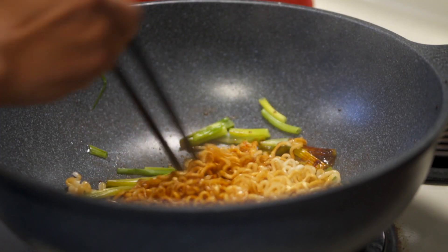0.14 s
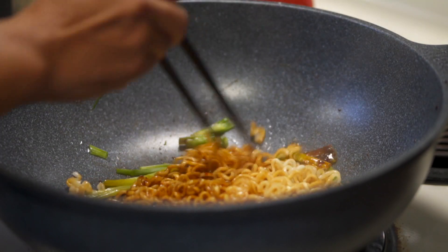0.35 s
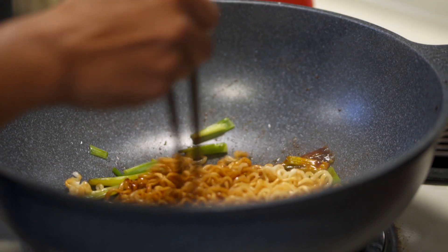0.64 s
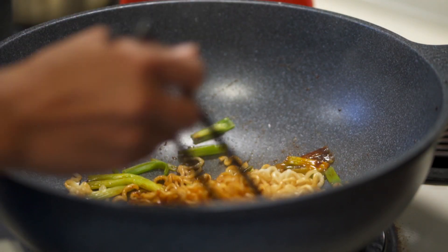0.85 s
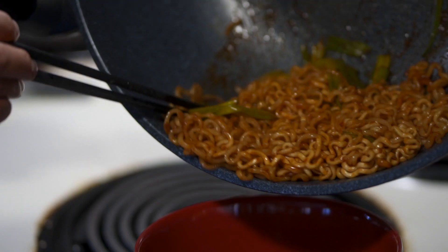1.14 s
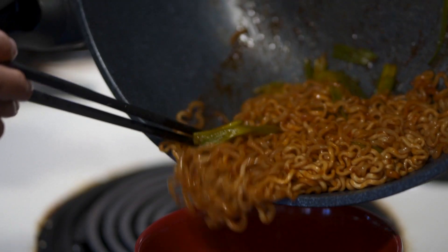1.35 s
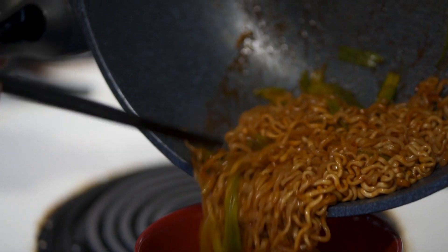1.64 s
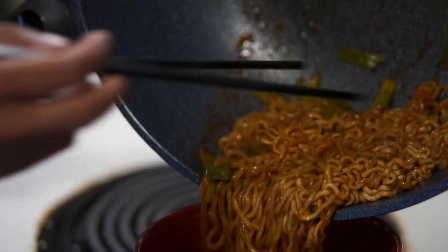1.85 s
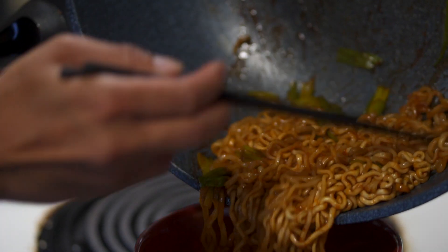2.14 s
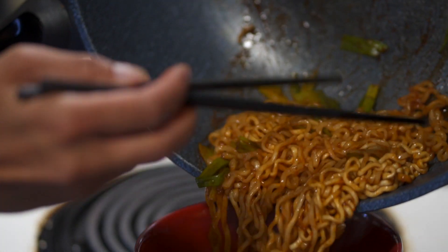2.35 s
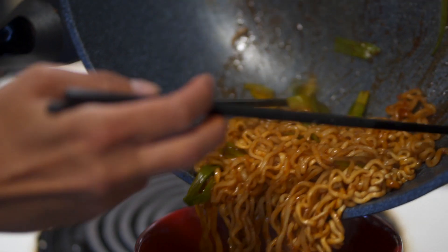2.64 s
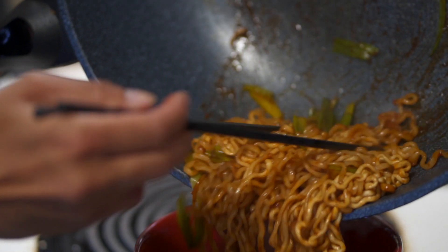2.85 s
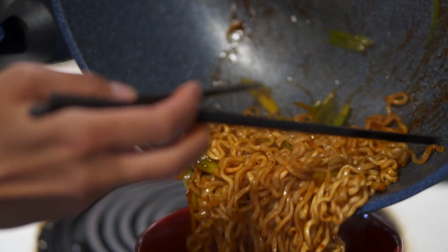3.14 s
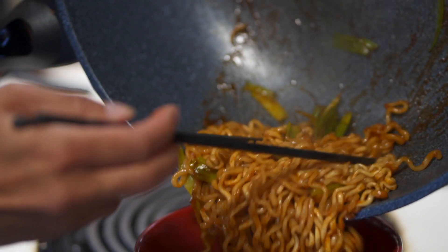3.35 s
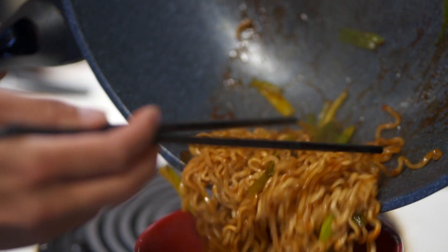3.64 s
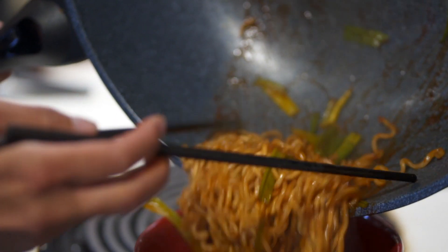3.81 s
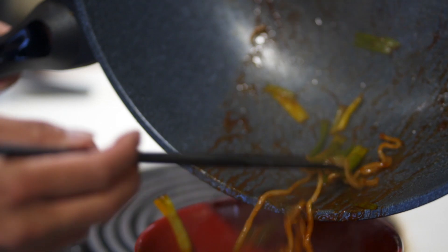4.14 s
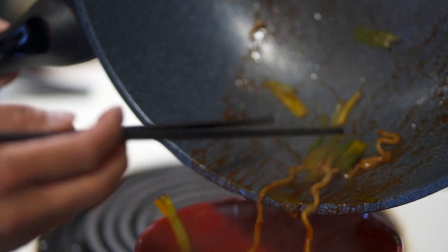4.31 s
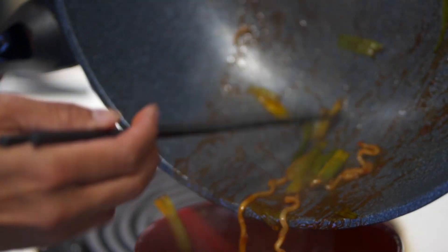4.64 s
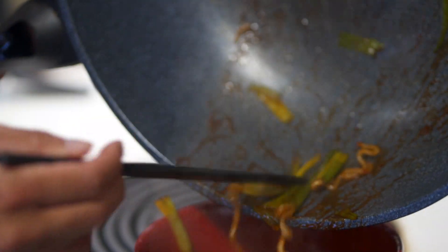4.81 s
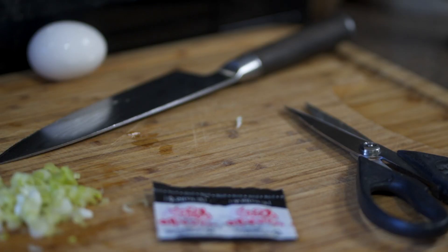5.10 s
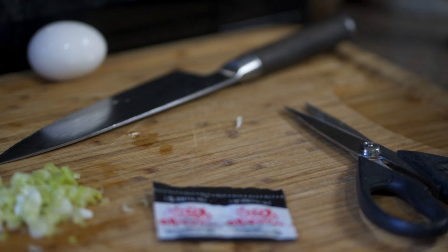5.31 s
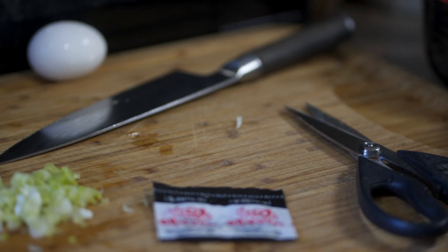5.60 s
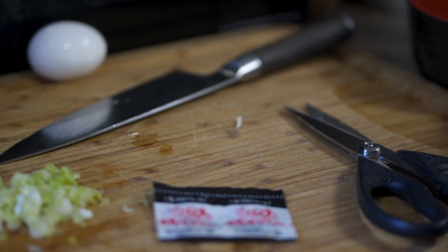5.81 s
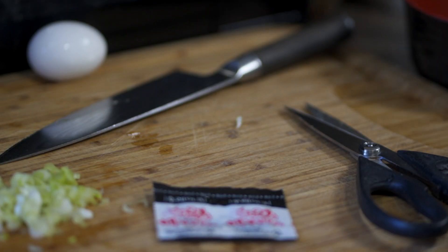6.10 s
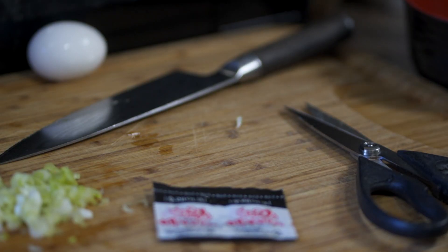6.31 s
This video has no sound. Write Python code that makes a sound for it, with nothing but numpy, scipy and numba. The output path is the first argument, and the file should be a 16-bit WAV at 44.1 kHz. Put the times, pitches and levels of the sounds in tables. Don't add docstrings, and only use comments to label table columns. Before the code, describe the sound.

Close kitchen sounds: hissing oil and sharp stirring taps, faint noodle touches, bright ringing wok scrapes, then a heavy bowl knock on wood over low hum.

```python
import sys
import numpy as np
from scipy import signal
from scipy.fft import rfft, irfft
from scipy.io import wavfile
from scipy.ndimage import uniform_filter1d
from numba import njit

SR = 44100
rng = np.random.default_rng(int(sys.argv[2]) if len(sys.argv) > 2 else 0)


def materialize(psi):
    bounded = np.clip(np.atleast_2d(psi).T, -1, 1)
    quanta = np.round(bounded * 32767).astype(np.int16)
    wavfile.write(sys.argv[1], SR, quanta)


def how_loud(loudness_db):
    steps = np.asarray(loudness_db, float) / 20
    return 10 ** steps


N = 284886
SPAN = 22050
BANDS_HZ = 16000 / 2. ** np.arange(9)

SCENE_S = (0, 1.135, 4.93, 6.47)
EMPTYING_S = (2.7, 3.7, 3.85)

# frequency in Hz, level in dB per Hz.
WOK_FULL = [(35, -45.5), (60, -21), (165, -16), (600, -11.5), (796, -3.5), (1690, -13), (2090, -7),
            (2460, -9.5), (4030, -0.5), (4750, -10.5), (6150, 0.5), (12700, -22), (16500, -40)]
# frequency in Hz, level in dB per Hz.
WOK_LOADED = [(290, -33.5), (500, -21.5), (1450, -17.5), (2540, -12.5), (2980, -11), (3880, -4), (4550, -5),
              (11100, -10), (15300, -23.5), (16500, -43.5)]
# frequency in Hz, level in dB per Hz.
WOK_TIPPED = [(240, -34.5), (400, -9.5), (679, -19.5), (769, -15.5), (844, -10), (1700, -19.5),
              (2980, -16.5), (3320, -15.5), (3530, -15), (5380, -3), (10700, -14.5), (15300, -37),
              (16500, -63)]
# frequency in Hz, level in dB, t60 in seconds.
WOK_MODES = [(768, -1, .8), (1416, -11, .5), (2374, -3, .3), (3040, -1, .4), (3594, -6, .4), (4000, -6, .4),
             (4430, -7, .35), (4570, -12, .2), (5206, -12, .3), (5410, -9, .25), (5720, -11, .3),
             (6090, -12, .3), (6778, -14, .3), (7246, -14, .3), (8260, -16, .25)]
# time in seconds, peak in dB, tilt in dB per octave, low part in dB.
STIR_TAPS = [(0.158, 3.5, 5.5, -40), (0.1789, -4.5, -4.5, -29.5), (0.1968, -7.5, -2, -26),
             (0.3754, -1, 0, -12.5), (0.4252, -8.5, -3, -15), (0.4884, -23, -4.5, 1),
             (0.5147, -17, -3, -6.5), (0.6812, 5.5, 2.5, -27), (0.8148, -20, 10, -35.5),
             (0.933, 0.5, -1.5, -23)]
# time in seconds, peak in dB, tilt in dB per octave, low part in dB.
TOUCHES = [(1.167, -30, 2.5, -18.5), (1.3521, -54, 12.5, -26), (1.368, -22, 3.5, -13.5),
           (1.8016, -41.5, -12, -17), (1.821, -29.5, -7, -27), (1.877, -28.5, 2.5, -17.5),
           (1.9428, -40.5, -16, -11.5), (1.9825, -44, -14, -18), (2.116, -39.5, -12, -23.5),
           (2.181, -23.5, 4.5, -10.5), (2.2025, -24.5, 3.5, -18), (2.5092, -41.5, -9.5, -22),
           (2.592, -58, 4.5, -1.5), (3.7651, -15, 9, -16.5)]
# time in seconds, peak in dB, tilt in dB per octave, low part in dB.
SCRAPE_TAPS = [(2.7277, -3.5, 3, -31.5), (2.7826, -19.5, 1.5, -18.5), (3.1118, -44.5, 10.5, -15.5),
               (3.1384, -19.5, 1.5, -31), (3.2037, -7, 2.5, -25), (3.2824, -6.5, 1, -51),
               (3.688, -44.5, -6, -15), (3.9047, -0.5, 3, -29), (3.9408, -7, 3.5, -30),
               (4.118, -31, -7.5, -7), (4.1794, -43.5, 13, -3.5), (4.2574, -47, 15.5, 0.5),
               (4.5198, -29.5, -3.5, -27.5), (4.6628, 0.5, 3.5, -27), (4.6795, -0.5, 3.5, -38)]
# start in seconds, swell in seconds, level in dB, t60 in seconds,
# tilt in dB per octave.
DRAGS = [(0.1485, 0.0016, -21, 0.022, 6.5), (0.17, 0.045, -23.5, 0.46, 0.5), (0.39, 0.046, -23.5, 0.28, -4),
         (0.506, 0.032, -28.5, 0.05, 6), (0.70, 0.037, -14.5, 0.23, -5.5), (0.80, 0.042, -28, 0.41, -1),
         (0.95, 0.047, -32.5, 0.85, -1), (2.76, 0.062, -31, 0.34, -3), (3.23, 0.02, -31, 0.25, -1.5),
         (3.31, 0.019, -36.5, 0.49, -1.5), (3.764, 0.028, -35.5, 0.17, -0.5),
         (3.96, 0.047, -25.5, 0.14, -0.5), (4.04, 0.02, -34, 0.31, 1), (4.695, 0.011, -20, 0.57, -1.1)]
DRAG_LOW_DB = (-15.5, -9.5, -19.5)
# time in seconds, peak in dB.
CRACKS = [
    (.158, -6),
    (0.3755, -7),
    (.8148, -21.5),
    (.933, -9),
    (3.2849, -13.5),
    (3.908, -8.5),
    (4.6669, -2.5),
    (.1487, -10),
]
# time in seconds, swell in seconds, level in dB, share of free decay 0-1.
RINGS = [(0.389, 0.013, -43, 0.8), (0.935, 0.0057, -25.5, 0.21), (2.729, 0.014, -35, 1),
         (2.815, 0.018, -32, 0.41), (3.202, 0.0016, -61, 0.5), (3.24, 0.027, -34, 1),
         (3.281, 0.0047, -32, 0.29), (3.905, 0.0026, -42, 0.34), (3.98, 0.019, -37, 0.55),
         (4.664, 0.0039, -36.5, 0.45), (4.69, 0.0096, -23, 1)]
# time in seconds, frequency in Hz, level in dB, t60 in
# seconds.
WOK_PINGS = [(0.181, 3930, -6.5, 0.067), (0.187, 2856, -11.5, 0.082), (0.412, 161, -28.5, 0.27),
             (0.712, 2103, -14.5, 0.19), (1.17, 6850, -47.5, .35), (1.17, 8520, -39, 0.1),
             (1.369, 3920, -35.5, 0.16), (1.37, 12480, -49, 0.12), (1.821, 9040, -45, 0.03),
             (1.885, 6300, -47.5, 0.3), (1.878, 8530, -40, 0.1), (1.943, 2800, -46, .1),
             (2.182, 3920, -34, 0.21), (2.20, 5260, -42.5, 0.62), (2.21, 7250, -47, 0.38),
             (2.203, 10660, -33, 0.1), (1.17, 5000, -48, 0.15), (1.18, 4290, -50, 0.28),
             (1.372, 5220, -44, 0.11), (1.39, 5840, -51, 0.34), (1.37, 11600, -53, .14),
             (1.878, 11400, -52, .15), (2.203, 9800, -51, 0.17), (2.203, 11500, -48, .13),
             (2.51, 7430, -57.5, 0.17),
             (2.728, 3025, -28, .24), (2.822, 2480, -36, .36), (3.139, 7400, -31, .06),
              (3.285, 2400, -30, .2), (3.285, 1414, -40.5, .55), (3.775, 5310, -29, .17),
              (3.906, 3050, -22.5, .22), (3.907, 3830, -11, .075), (3.99, 1560, -39, .25),
              (4.67, 2374, -23.5, .36), (4.699, 1416, -31, .45), (4.664, 1416, -31, .3),
              (4.0, 770, -42, .3), (3.906, 2200, -18, .045), (.376, 11300, -16, .025),
              (.378, 5300, -19, .1), (.44, 10500, -38, .04), (3.206, 950, -31, .06), (3.33, 2480, -41, .3),
              (3.344, 3960, -32, .08), (4.667, 5500, -13, .04), (4.80, 3050, -36, .3),
              (3.92, 5470, -21, .07), (3.905, 1567, -30, .1), (3.79, 5750, -46, .4), (4.70, 4020, -26, .35),
              (2.845, 3040, -37, .3), (3.139, 3600, -36, .05), (3.139, 6100, -33, .08),
              (4.757, 4450, -27, .2), (4.519, 3600, -42, .035), (3.32, 3050, -41, .38),
             (0.159, 6030, -1.5, 0.046), (.376, 950, -22, 0.042), (.388, 1590, -24.5, 0.17),
             (.389, 474, -30, 0.11), (.404, 963, -23.5, 0.13), (.436, 790, -28, 0.13),
             (0.439, 478, -25.5, 0.12), (.515, 810, -29.5, 0.1), (.682, 2795, -10.5, .05),
             (.934, 3920, -11.5, 0.046), (2.728, 4430, -15, 0.089), (2.728, 6140, -14, .05),
             (2.728, 6670, -8.5, 0.036), (2.785, 3610, -32, .2), (2.79, 3920, -33.5, 0.39),
             (3.203, 6460, -10.5, 0.038), (3.203, 8330, -14.5, 0.044), (3.204, 4400, -23, .07),
             (3.245, 3620, -35.5, 0.35), (3.283, 5380, -6.5, 0.038), (3.283, 3920, -15.5, 0.05),
             (3.284, 3033, -19, 0.094), (3.283, 3650, -26, 0.09), (3.905, 4380, -23, .09),
             (3.906, 6240, -25, 0.067), (3.942, 5394, -16, 0.054), (3.943, 6270, -16.5, 0.071),
             (3.943, 4500, -26.5, 0.09), (3.985, 4420, -39, .25), (4.663, 5350, -4.5, 0.055),
             (4.664, 6130, -7.5, 0.057), (4.663, 7750, -3.5, 0.048), (4.663, 8160, -13, 0.043),
             (4.68, 4450, -16.5, 0.085), (4.681, 5696, -14, .08), (4.679, 3000, -18, .12),
             (4.705, 3670, -24, 0.25), (4.72, 5440, -20, 0.16), (4.723, 5880, -16.5, 0.083),
             (4.757, 4040, -24, 0.19), (4.664, 775, -31, 0.34)]
# time in seconds, frequency in Hz, level in dB, t60 in seconds.
MORE_PINGS = [(2.183, 6550, -40, .08), (2.205, 5700, -46, .25), (2.205, 8550, -46, .15),
              (4.52, 7400, -43, .05), (4.52, 9000, -45, .05), (4.521, 6000, -46, .1),
              (4.05, 1416, -50, .45), (3.99, 4420, -35, .15), (5.69, 3400, -25, .12),
              (5.715, 1100, -19, .1), (1.39, 5650, -51, .3)]

# frequency in Hz, level in dB per Hz.
BOARD = [(24, -48), (40, -36.5), (77, -8.5), (145, -1.5), (186, -32), (228, 1), (300, -12.5), (744, -10),
         (1230, -15.5), (2250, -19.5), (3920, -24), (4680, -25.5), (5050, -24), (11600, -44.5),
         (16500, -57)]
# time in seconds, peak in dB, tilt in dB per octave, low part in dB.
KNOCKS = [
    (5.435, -32, 4, -21),
    (5.4877, -37, 0.5, -19),
    (5.6193, 8, 1, -19),
    (5.636, 5, 3.5, -9),
    (5.8022, -15.5, 1.5, -17),
    (5.8572, -0.5, -0.5, -16),
]
# time in seconds, peak in dB.
BOARD_CRACKS = [
    (5.4885, -37),
    (5.8025, -16.5),
    (5.8575, -0.5),
    (5.6195, 0),
]
# start in seconds, swell in seconds, level in dB, t60 in seconds, low part in dB.
SLIDES = [
    (5.298, 0.015, -52.5, 0.19, 12),
    (5.645, 0.052, -12.5, 0.13, -6),
    (5.70, 0.017, -17, 0.41, -10),
    (5.766, 0.024, -28.5, 0.077, -11),
    (5.80, 0.014, -22, 0.19, -2),
    (5.862, 0.017, -21, 0.15, -2.5),
    (5.90, 0.04, -32, 0.3, -5),
    (6.04, 0.045, -58, 0.48, 10),
]
# time in seconds, frequency in Hz, level in dB, t60 in seconds.
ROCKING = [(5.62, 865, -5, 0.082), (5.62, 600, -7.5, 0.11), (5.634, 136.5, -15, 0.12),
           (5.637, 748, -4.5, 0.11), (5.643, 250, -8.5, .12), (5.644, 418, -10.5, 0.077),
           (5.661, 83.6, -24, 0.59), (5.668, 640, -7.5, 0.084), (5.671, 248.3, -10.5, 0.084),
           (5.678, 117, -15, 0.13), (5.685, 207, -14, 0.076), (5.69, 581, -13, 0.093),
           (5.695, 267.5, -14, 0.092), (5.709, 701, -6, 0.093), (5.709, 511, -14.5, .1),
           (5.716, 383, -13, 0.09), (5.723, 1071, -11, 0.074), (5.775, 732, -15.5, 0.07),
           (5.801, 770, -16.5, 0.078), (5.803, 969, -15.5, .06), (5.807, 323, -13, 0.087),
           (5.815, 577, -12, 0.12), (5.815, 192, -11.5, 0.083), (5.829, 170.9, -13.5, 0.12),
           (5.857, 752, -7.5, 0.14), (5.857, 602, -8.5, 0.066), (5.857, 986, -10.5, 0.059),
           (5.867, 437, -10.5, 0.076), (5.873, 301, -10, 0.085), (5.886, 117, -19.5, 0.19),
           (5.891, 603, -22, 0.12), (5.92, 226, -25, 0.23), (5.91, 86.4, -26.5, 0.36),
           (6.0, 73.8, -36.5, 0.91)]
# time in seconds, frequency in Hz, level in dB, t60 in seconds.
BOWL_PINGS = [(5.62, 2190, -3, .03), (5.637, 2280, -14, .04), (5.649, 4753, -21, .29),
              (5.705, 3327, -26, .12), (5.70, 2218, -25, .08), (5.735, 2820, -36, .35),
              (5.801, 3350, -22, .07), (5.857, 2261, -9, .035), (5.915, 2260, -33, .2),
              (5.868, 2100, -25, .05), (5.70, 4650, -28, .2), (5.639, 1640, -17, .06)]
# time in seconds, peak in dB, tilt in dB per octave, low part in dB.
FOOT_TICKS = [
    (5.8024, -17.5, -4, -12),
    (5.8274, -27, 5, -26),
    (5.8812, -26.5, 3.5, -30),
    (5.9236, -31.5, 0.5, -30),
    (5.868, -22, -8, -15),
]
GLAZE_HZ = (2230, 2800, 3350, 4620, 5680, 6570, 7880, 9030, 11350)
# start in seconds, swell in seconds, level in dB, t60 in seconds,
# tilt in dB per octave.
GRINDS = [
    (5.65, .03, -26.5, 0.39, -12),
    (5.74, 0.052, -38, .4, -7),
    (5.875, 0.018, -38, 0.37, -3),
    (5.92, 0.018, -41, 0.27, -2),
]

# frequency in Hz, level in dB per Hz.
CLOTH = [(300, -33), (1500, -9), (4500, 1.5), (8000, -2.5), (16000, -27)]
# start in seconds, level in dB, t60 in seconds.
RUSTLES = [
    (4.991, -55, 0.27),
    (5.07, -56.5, .2),
    (5.119, -51.5, 0.15),
    (5.195, -52, 0.12006),
    (5.306, -53.5, 0.38),
    (5.525, -54.5, 0.16),
    (6.118, -47.5, 0.75),
    (6.199, -55, 0.35),
    (6.295, -54.5, 0.31),
    (6.388, -55.5, .3),
]
# time in seconds, peak in dB, tilt in dB per octave, low part in dB.
TICKS = [
    (.318, -21.5, -8, -20),
    (1.568, -47.5, 14.5, -30),
    (1.64, -53.5, 6, -31.5),
    (2.02, -52.5, 5.5, -29),
    (2.452, -48.5, 8, -28),
    (2.593, -42, 11.5, -30.5),
    (4.441, -42, 3, -32.5),
]

# time in seconds, level in dB.
FRY = [
    (0.0, -32.5),
    (0.232, -41.5),
    (0.356, -37),
    (0.518, -34.5),
    (0.89, -32.5),
    (0.972, -35.5),
    (1.02, -36.5),
    (1.135, -38),
]
# frequency in Hz, level in dB per Hz.
SIZZLE = [(290, -40.5), (500, -12.5), (753, -2), (1090, -19.5), (1290, -2), (1410, -11), (3880, -4.5),
          (11000, -7.5), (15600, -19), (16500, -37)]
# frequency in Hz, level in dB per Hz.
AIR_STOVE = [(15, -50.5), (25, -35.5), (105, -2.5), (167, -3), (220, -4.5), (266, -4), (553, -13.5),
             (952, -20.5), (1060, -20), (2670, -31.5), (3910, -28), (4240, -30.5), (9080, -33.5),
             (15200, -42), (16500, -74.5)]
# frequency in Hz, level in dB per Hz.
AIR_BOARD = [(15, -53), (25, -28), (150, -11), (220, -0.5), (245, -19), (280, -26.5), (330, -21.5),
             (902, -29.5), (1060, -33), (3910, -36.5), (11000, -43), (15200, -47.5), (16500, -70.5)]
AIR_DB = (-47, -48, -42.5)
# frequency in Hz, level in dB, waver in dB,
# gain near the board in dB.
HUM = [(55.7, -59, 2, 2), (63, -57.5, 0.5, 0), (111, -53, 3.5, 2.5), (182, -71.5, 4.5, 14),
       (219.7, -44, 6, 8), (325, -58.5, 4.5, 1.5), (401, -59, -1.5, -2.5), (1053, -64.5, 3, -3),
       (3800, -73, 6, 5)]

# clatter t60 in seconds, its growth in dB per dB of tilt, after-rattle in dB.
FULL_DECAY, LOADED_DECAY = (0.066, 0.05, -16), (0.091, 0.76, -15)
BARE_DECAY, BOARD_DECAY = (0.04, 0.3, -12.5), (0.034, 0.3, -22)
CRACK_DECAY = (0.014, 0.01, -30)
TICK_DECAY = (0.028, .01, -34.5)


def shape(table, hz):
    f, db = np.transpose(table)
    return np.interp(np.log(np.maximum(hz, 1)), np.log(f), db)


def noise(table):
    x = irfft(rfft(rng.standard_normal(N)) * how_loud(shape(table, np.arange(N // 2 + 1) * SR / N)), N)
    return x / x.std()


def walk(rate_hz):
    k = int(SR / rate_hz)
    held = np.repeat(rng.standard_normal(N // k + 1), k)
    return 0.18 * uniform_filter1d(uniform_filter1d(held, k), k)[:N]


def fade(t, t60):
    return np.exp(-np.log(1000) * np.maximum(t, 0) / t60)


def add(out, x, s):
    i = int(s * SR)
    scene_end = int(SCENE_S[np.searchsorted(SCENE_S, s, side="right")] * SR)
    end = min(scene_end, N, i + len(x))
    out[i:end] += x[:end - i]


def contact(colour, split_hz, tilt_db, low_db, envelope, ripple_db, ripple_hz, damping):
    t, f = np.arange(SPAN) / SR, np.arange(SPAN // 2 + 1) * SR / SPAN
    ripple = ripple_db * np.interp(f, ripple_hz * np.arange(2000), rng.standard_normal(2000))
    tilt = tilt_db * np.log2(np.maximum(f, split_hz) / split_hz)
    gain = how_loud(shape(colour, f) + ripple + tilt)
    low_share = 1 / (1 + (f / split_hz) ** 4)
    high, low = gain * (1 - low_share), gain * low_share
    gain = high / np.linalg.norm(high) + how_loud(low_db) * low / np.linalg.norm(low)
    spectrum = rfft(rng.standard_normal(SPAN)) * gain * np.sqrt(SPAN / 2)
    octave = np.log2(np.clip(f, BANDS_HZ[-1], BANDS_HZ[0]) / BANDS_HZ[:, None])
    bands = irfft(spectrum * np.maximum(1 - np.abs(octave), 0), SPAN)
    t60_scale = (BANDS_HZ[:, None] / 4000) ** -damping
    return np.sum(bands * envelope(t, t60_scale), axis=0)


def strike(colour, table, decay, split_hz, ripple_hz, after_t60):
    out = np.zeros(N)
    flat_t60, growth, after_db = decay
    for s, peak_db, tilt_db, low_db in table:
        t60 = flat_t60 * how_loud(growth * tilt_db)

        def envelope(t, k):
            attack = np.minimum(t * k ** -2 / 0.00019, 1)
            return attack * (fade(t, t60 * k) + how_loud(after_db) * fade(t, after_t60 * k))

        blow = contact(colour, split_hz, tilt_db, low_db, envelope, 5.0, ripple_hz, damping=0.44)
        add(out, how_loud(peak_db - 8) * blow, s)
    return out


def rub(colour, table, split_hz, ripple_hz, grit_db):
    out = np.zeros(N)
    for s, swell_s, level_db, t60, tilt_db, low_db in table:
        slips = np.repeat(rng.standard_normal(SPAN // 150), 150)
        grit = how_loud(grit_db * uniform_filter1d(slips, size=100))

        def envelope(t, k):
            return grit * np.minimum(t / swell_s, 1) ** 0.51 * fade(t - swell_s, t60 * k)

        drag = contact(colour, split_hz, tilt_db, low_db, envelope, 3.5, ripple_hz, damping=0.07)
        add(out, how_loud(level_db) * drag, s)
    return out


def with_modes(colour):
    peak_db, width_hz = 10, 70
    f = np.arange(20., SR / 2, 10)
    peaks = [min(1, (3800 / hz) ** 2) / (1 + ((f - hz) / width_hz) ** 2) for hz, _, _ in WOK_MODES]
    return np.c_[f, shape(colour, f) + peak_db * np.max(peaks, axis=0)]


def chopsticks():
    full = (WOK_FULL, STIR_TAPS, FULL_DECAY, DRAG_LOW_DB[0])
    loaded = (WOK_LOADED, TOUCHES, LOADED_DECAY, DRAG_LOW_DB[1])
    bare = (with_modes(WOK_TIPPED), SCRAPE_TAPS, BARE_DECAY, DRAG_LOW_DB[2])
    states = (full, loaded, bare, loaded, bare)
    edges = (0, SCENE_S[1], *EMPTYING_S, SCENE_S[2])
    out = np.zeros(N)
    for (colour, taps, decay, low_db), start, end in zip(states, edges, edges[1:]):
        taps = [row for row in taps if start <= row[0] < end]
        drags = [(*row, low_db) for row in DRAGS if start <= row[0] < end]
        out += strike(colour, taps, decay, 1319, ripple_hz=118.3, after_t60=0.33)
        out += rub(colour, drags, 1600, ripple_hz=69.8, grit_db=1.0)
    return out


def wok_cracks():
    rows = [(*row, -4.5, -12) for row in CRACKS]
    return strike(WOK_LOADED, rows, CRACK_DECAY, 1400, ripple_hz=600, after_t60=0.05)


def ringing():
    flat_swell_s, sharp_tilt_db, pair_db = 0.01, 5, -6
    out, t = np.zeros(N), np.arange(SPAN) / SR
    hz, db, t60 = np.transpose(WOK_MODES)[:, :, None]
    phase = rng.random(hz.shape)
    pair = (hz > 2000) & (hz < 3300)
    for s, swell_s, level_db, share in RINGS:
        scatter_db = 4 * (rng.random(hz.shape) - 0.5)
        tilt_db = sharp_tilt_db * np.log2(flat_swell_s / swell_s)
        gain = how_loud(level_db + db + tilt_db * np.log2(hz / hz[0]) + pair_db * pair + scatter_db)
        sines = np.sin(2 * np.pi * (hz * (t + int(s * SR) / SR) + phase))
        modes = gain * sines * fade(t - swell_s, share * t60)
        add(out, np.minimum(t / swell_s, 1) * modes.sum(axis=0), s)
    return out


def lone_modes():
    flutter_db, flutter_hz = 3.5, 120
    out, t = np.zeros(N), np.arange(SPAN) / SR
    pings = WOK_PINGS + BOWL_PINGS + ROCKING + MORE_PINGS
    for s, hz, db, t60 in pings:
        walks = rng.standard_normal((2, 80))
        waver, drift = (np.interp(t * flutter_hz, np.arange(80), row - row[0]) for row in walks)
        tone = np.sin(2 * np.pi * hz * t + 0.5 * drift) * how_loud(db + flutter_db * waver * 0.5)
        attack = np.minimum(t / max(0.0012, 1 / hz), 1)
        add(out, attack * tone * fade(t, t60), s)
    return out


def bowl_on_board():
    knocks = strike(BOARD, KNOCKS, BOARD_DECAY, 320, ripple_hz=85.5, after_t60=0.26)
    slide_rows = [(*row[:4], -2, row[4]) for row in SLIDES]
    slides = rub(BOARD, slide_rows, 390, ripple_hz=38.8, grit_db=2.0)
    crack_rows = [(*row, 3, -15) for row in BOARD_CRACKS]
    cracks = strike(BOARD, crack_rows, CRACK_DECAY, 1000, ripple_hz=407, after_t60=0.05)
    clicks = strike(CLOTH, FOOT_TICKS, TICK_DECAY, 1300, ripple_hz=600, after_t60=0.12)
    return knocks + slides + cracks + clicks


def grinding():
    width_hz, floor_db = 90, -12
    f = np.arange(20., SR / 2, 10)
    peaks = sum(1 / (1 + ((f - hz) / width_hz) ** 2) for hz in GLAZE_HZ)
    floor = how_loud(2 * floor_db) / (1 + (f / 9000) ** 4)
    colour = np.c_[f, 10 * np.log10(peaks + floor)]
    return rub(colour, [(*row, -40) for row in GRINDS], 1400, ripple_hz=198, grit_db=2.5)


def hands():
    swell_s, tilt_db, low_db = 0.015, -1.5, -12.5
    brushes = [(s, swell_s, db, t60, tilt_db, low_db) for s, db, t60 in RUSTLES]
    return rub(CLOTH, brushes, 1270, ripple_hz=310, grit_db=3.0)


def food_ticks():
    return strike(CLOTH, TICKS, TICK_DECAY, 1300, ripple_hz=898, after_t60=0.1)


def sizzle():
    t = np.arange(N) / SR
    pops = 1 + (rng.random(N) < 600 / SR) * how_loud(13 * rng.random(N))
    gain = how_loud(shape(SIZZLE, np.arange(N // 2 + 1) * SR / N))
    hiss = irfft(rfft(rng.standard_normal(N) * pops) * gain, N)
    level_db = np.interp(t, *np.transpose(FRY)) + 0.8 * walk(18)
    return hiss / hiss.std() * how_loud(level_db) * (t < SCENE_S[1])


def kitchen():
    t = np.arange(N) / SR
    place = np.searchsorted(SCENE_S, t, side="right") - 1
    at_board = place == 2
    air = np.where(at_board, noise(AIR_BOARD), noise(AIR_STOVE))
    air = air * how_loud(np.array(AIR_DB)[place] + 0.5 * walk(5.4))
    hum = np.zeros(N)
    for hz, db, waver_db, near_db in HUM:
        level_db = db + 1 + waver_db * walk(9.5) + near_db * at_board
        hum += how_loud(level_db) * np.sin(2 * np.pi * hz * t + 0.38 * walk(15))
    return air + hum * how_loud(-1.5 * (place == 0))


def scene():
    wok = chopsticks() + wok_cracks() + ringing() + lone_modes()
    bowl = bowl_on_board() + grinding()
    mix = wok + bowl + hands() + food_ticks() + sizzle() + kitchen()
    return mix[None]


@njit
def duck(x, top, power, attack, release):
    y, e = np.empty(len(x)), 0.
    for i in range(len(x)):
        a = abs(x[i])
        e += (a - e) * (attack if a > e else release)
        y[i] = x[i] * min(1., top / (e + 1e-9)) ** power
    return y


def roll_off(x):
    return signal.sosfilt(signal.butter(12, 16200, fs=SR, output="sos"), x)


def record(dry):
    top_cut = signal.ellip(6, 0.2, 40, 15900, fs=SR, output="sos")
    x = signal.sosfilt(top_cut, dry[0])
    x = duck(x, how_loud(-14.5), 0.44, 1 / (0.0042 * SR), 1 / (0.02 * SR))
    mix = np.clip(x, -1, 1)[None]
    return roll_off(mix)


dry = scene()
out = record(dry)
materialize(out)
```